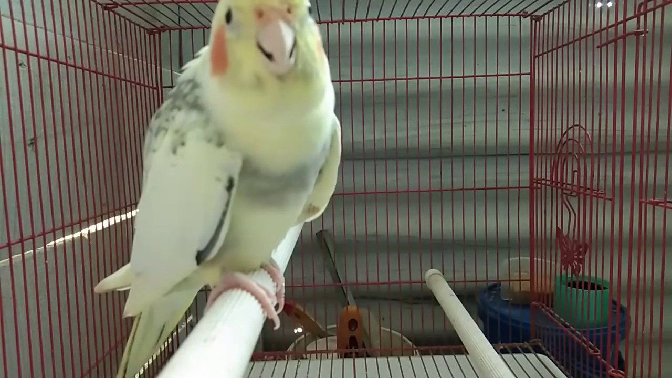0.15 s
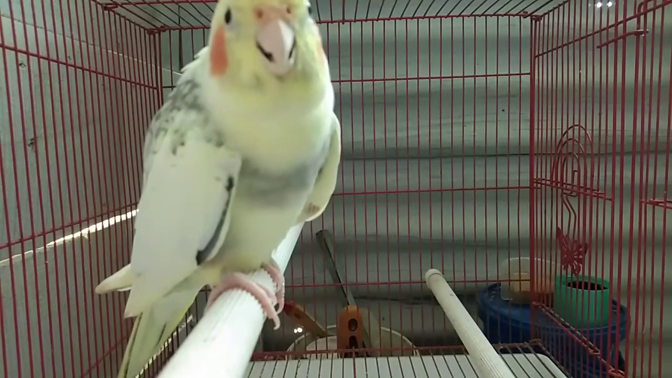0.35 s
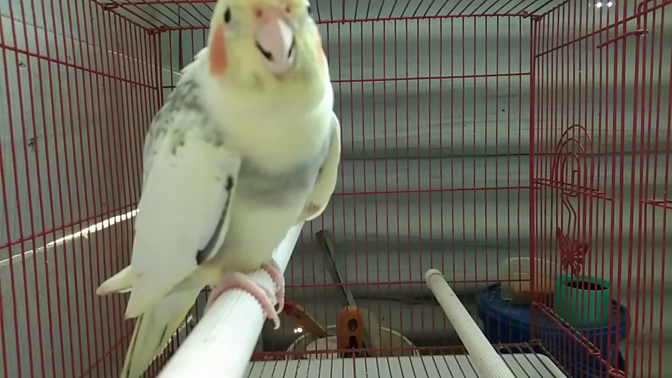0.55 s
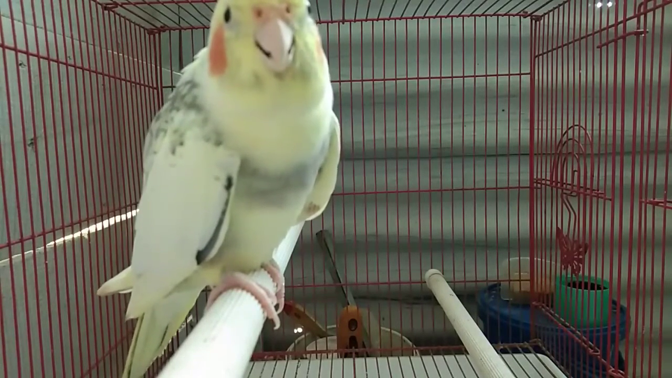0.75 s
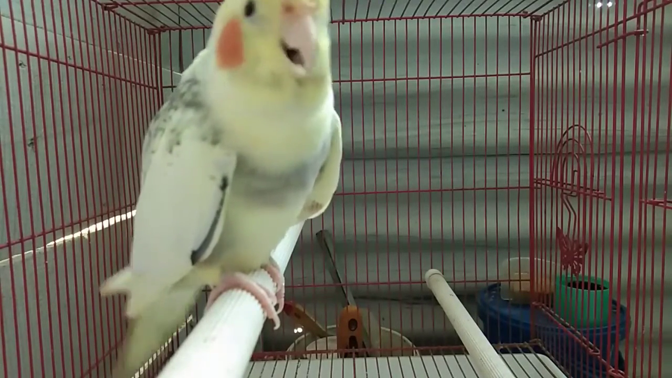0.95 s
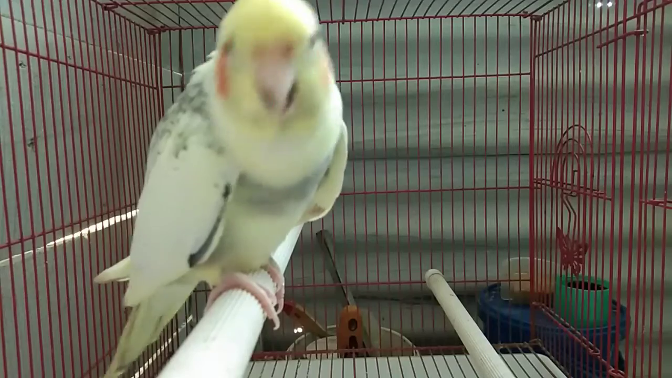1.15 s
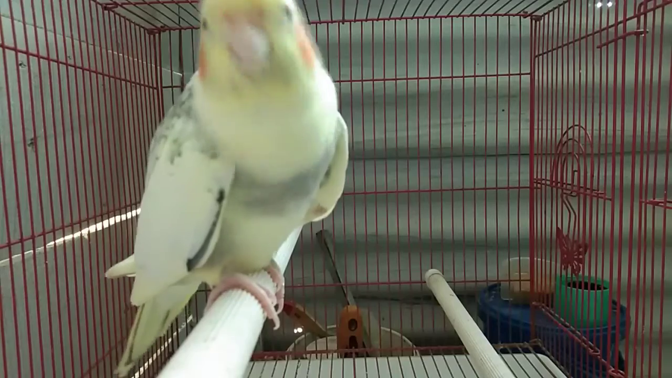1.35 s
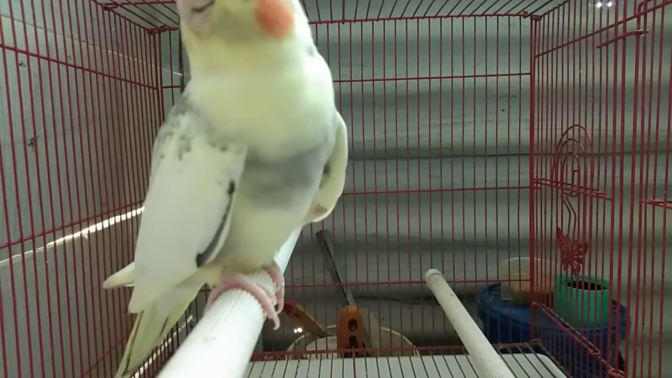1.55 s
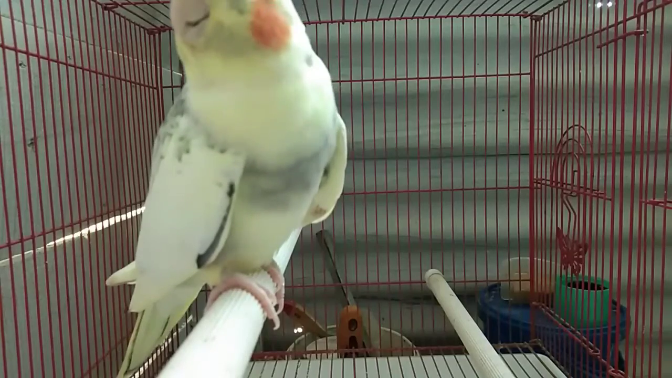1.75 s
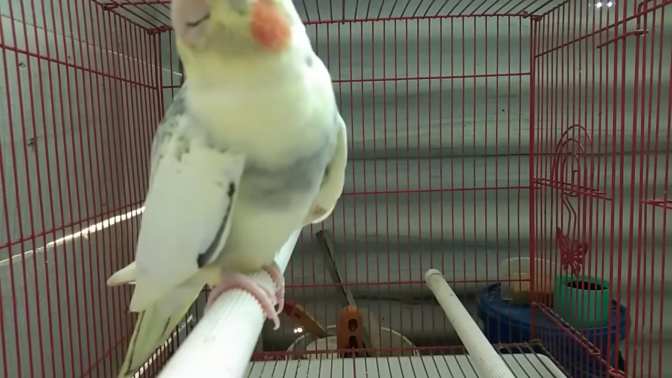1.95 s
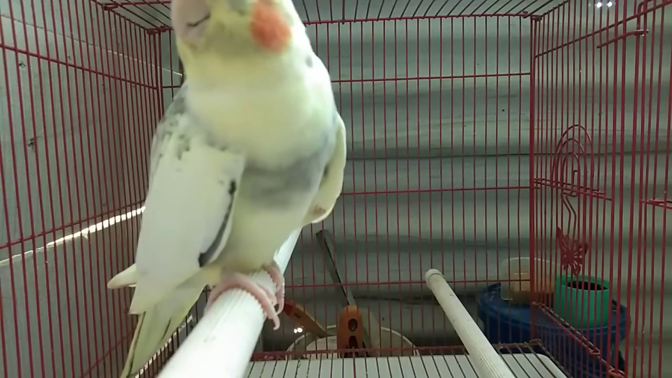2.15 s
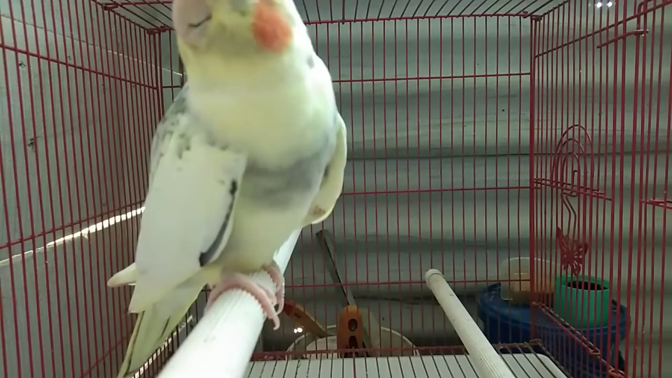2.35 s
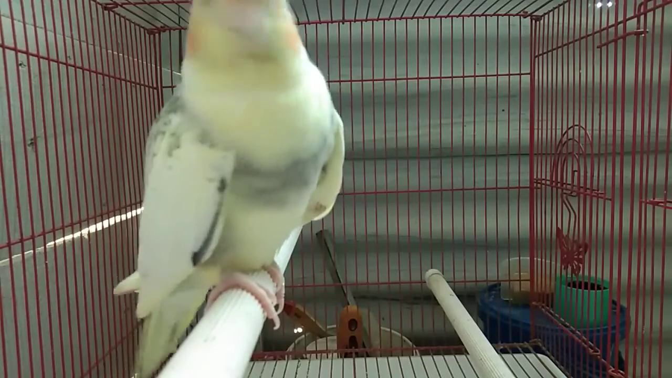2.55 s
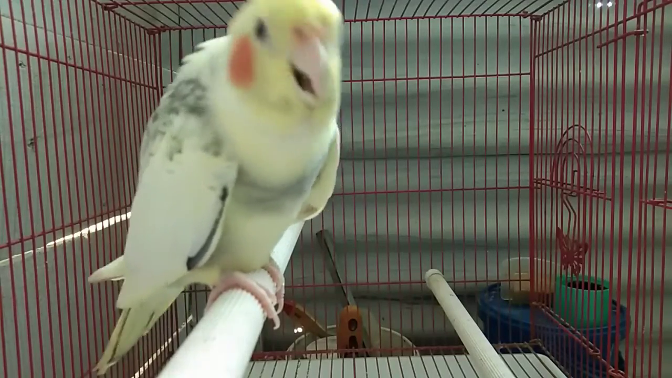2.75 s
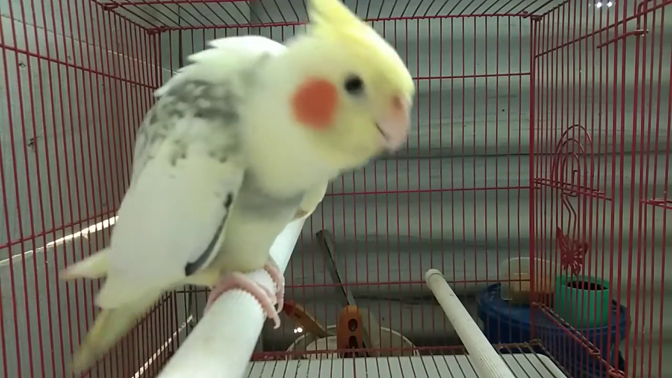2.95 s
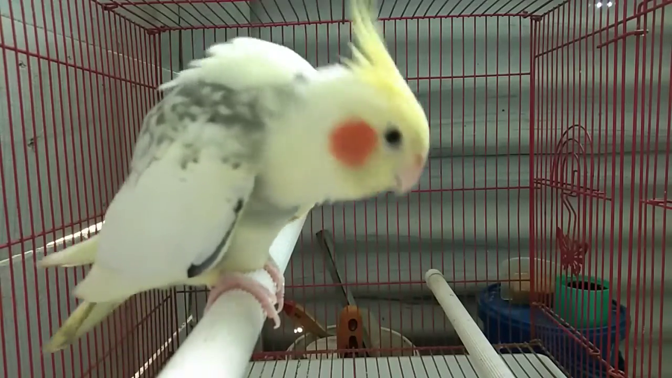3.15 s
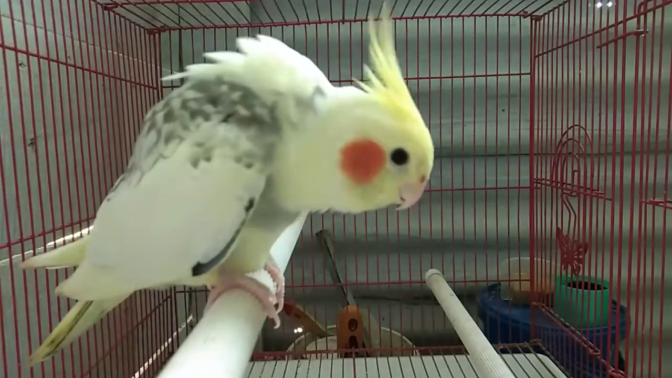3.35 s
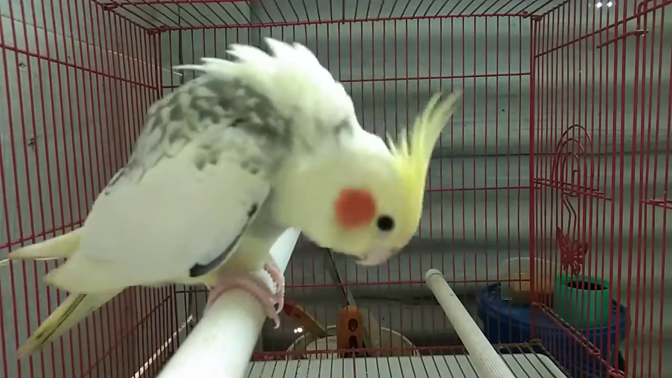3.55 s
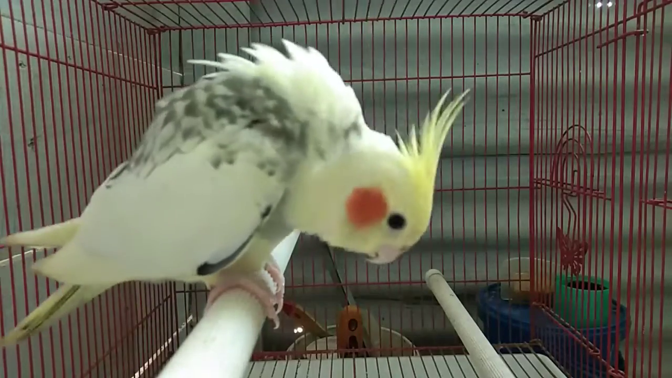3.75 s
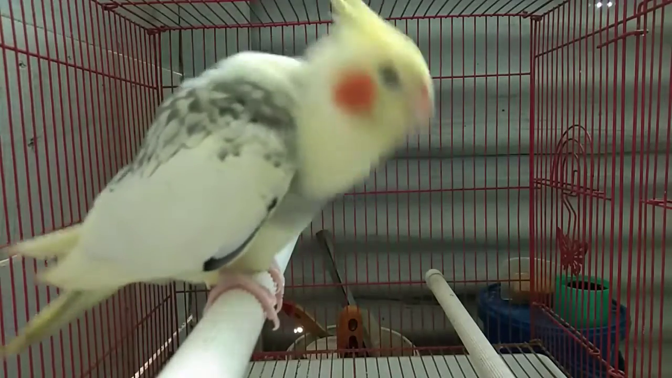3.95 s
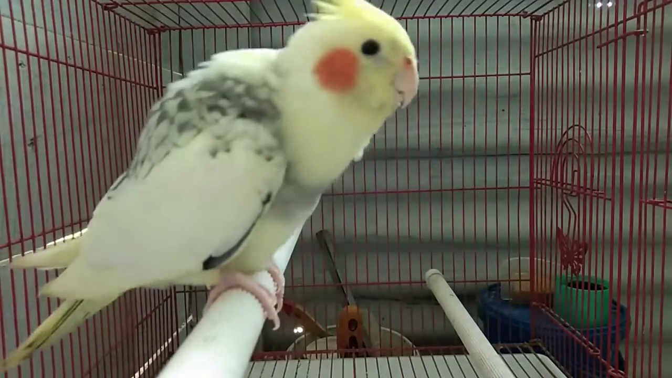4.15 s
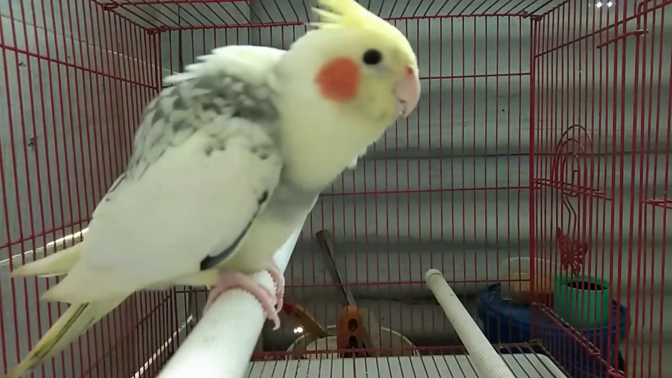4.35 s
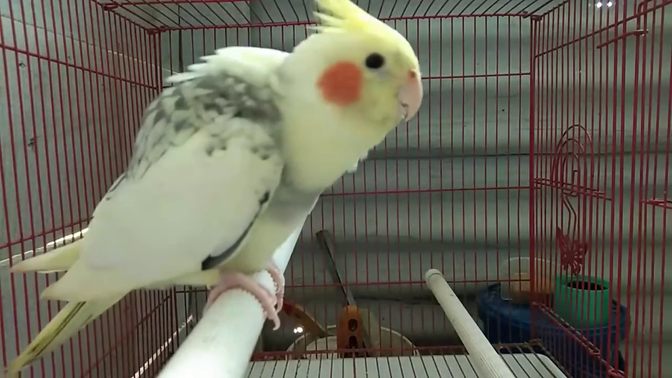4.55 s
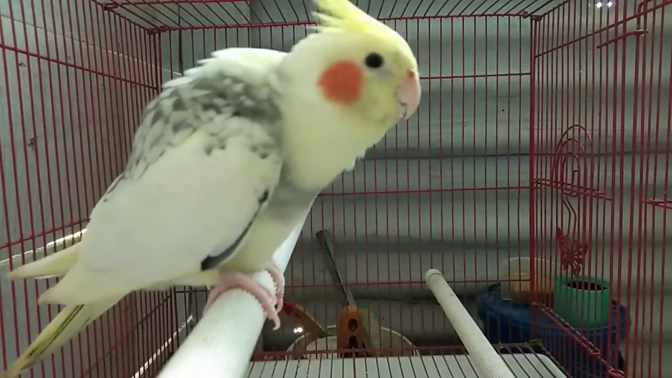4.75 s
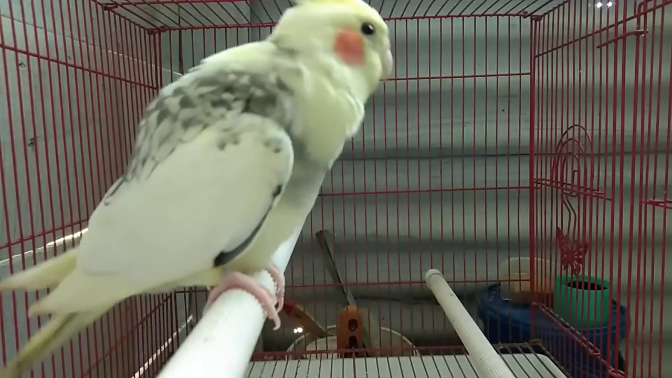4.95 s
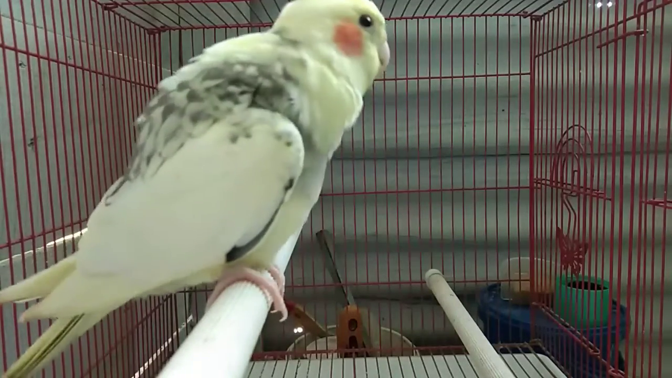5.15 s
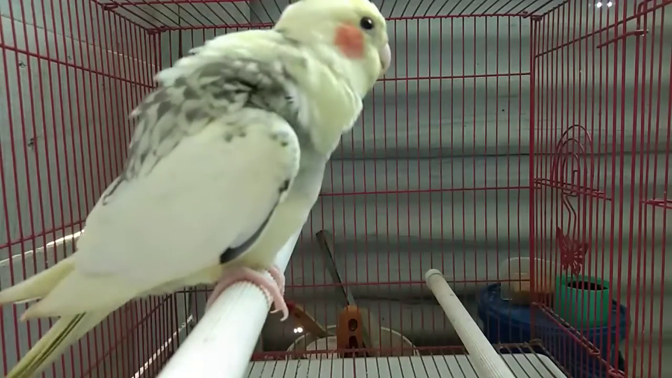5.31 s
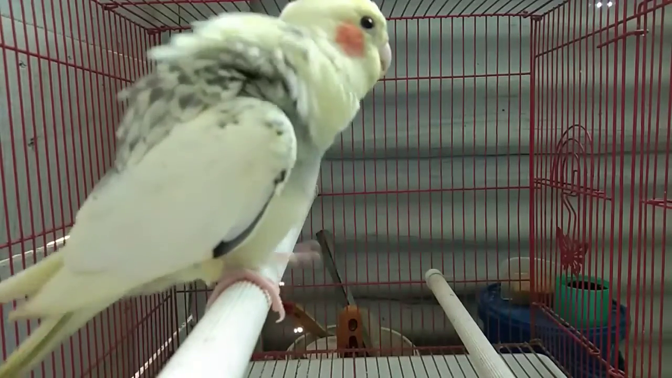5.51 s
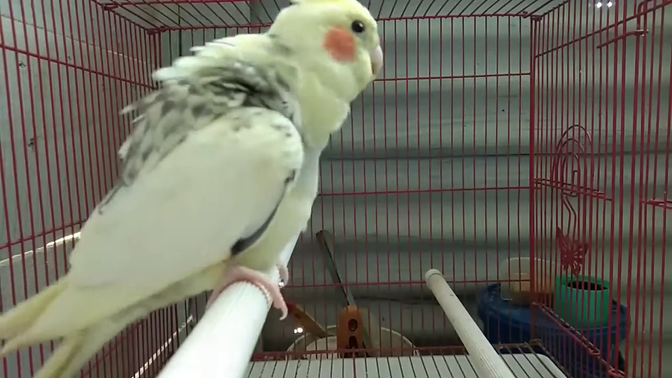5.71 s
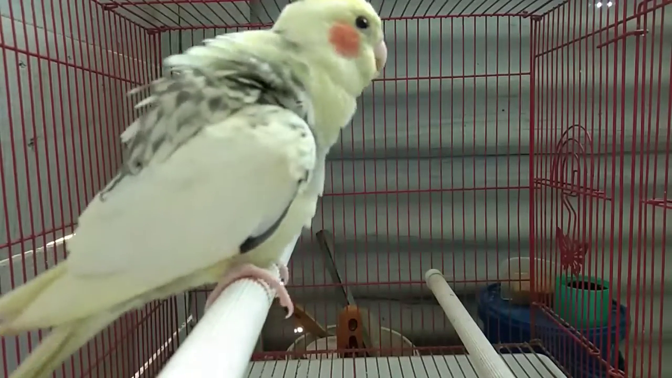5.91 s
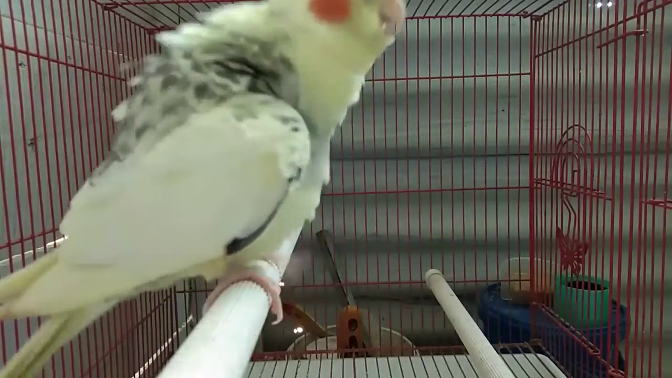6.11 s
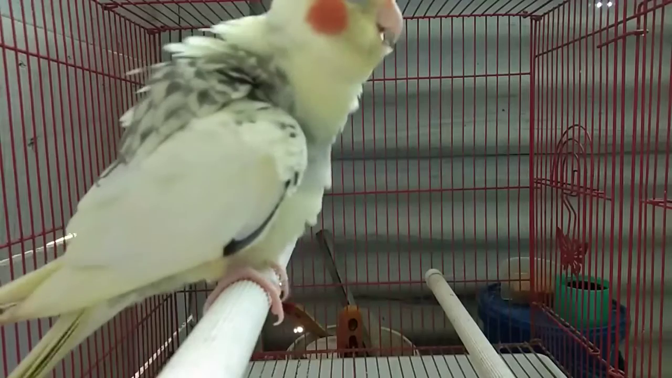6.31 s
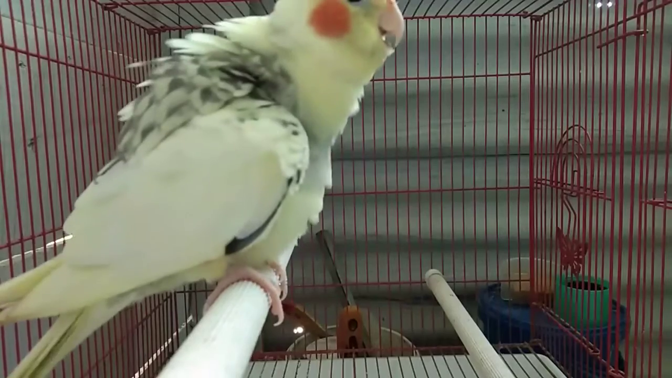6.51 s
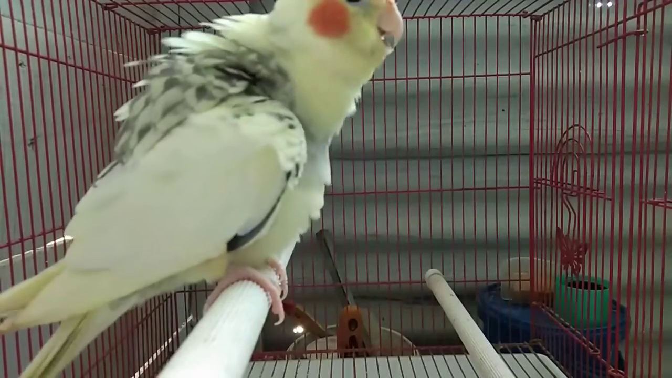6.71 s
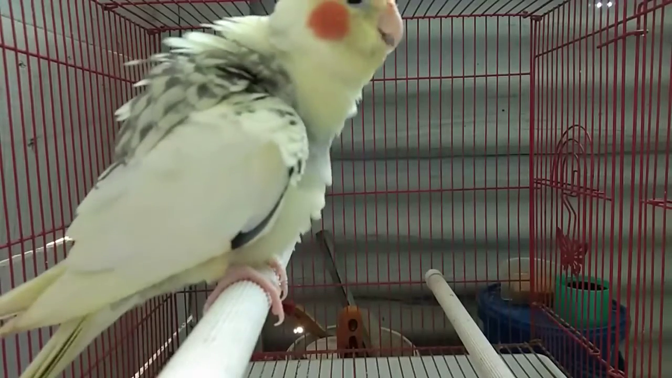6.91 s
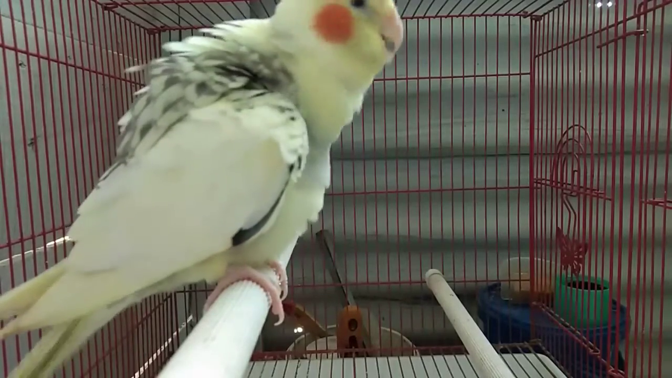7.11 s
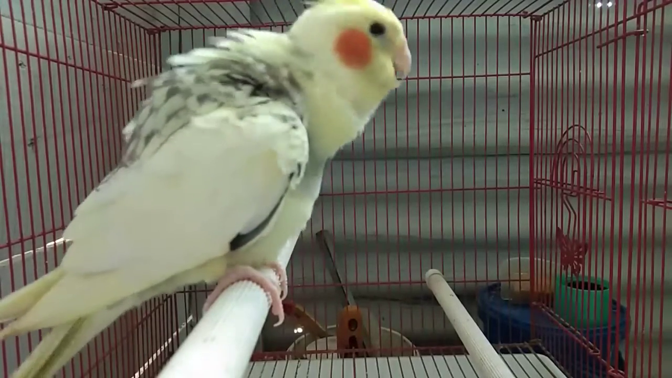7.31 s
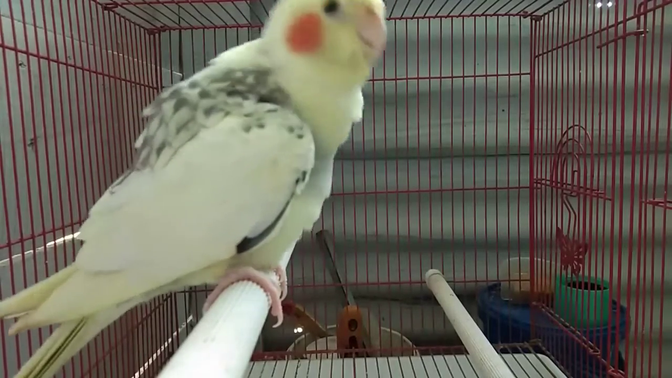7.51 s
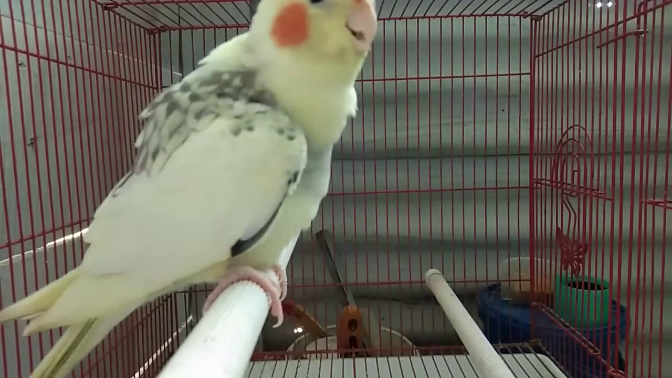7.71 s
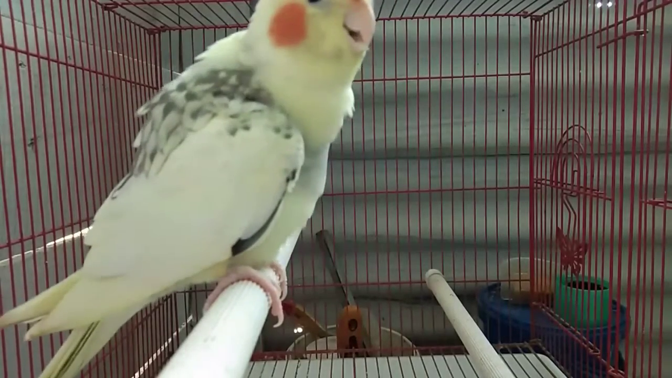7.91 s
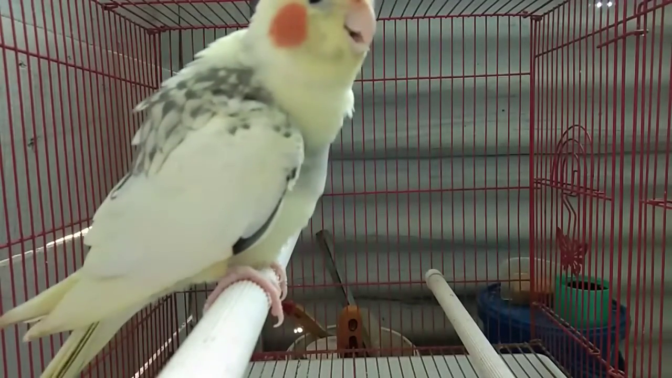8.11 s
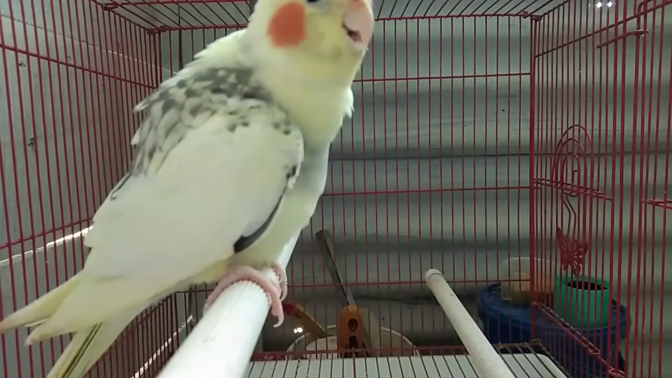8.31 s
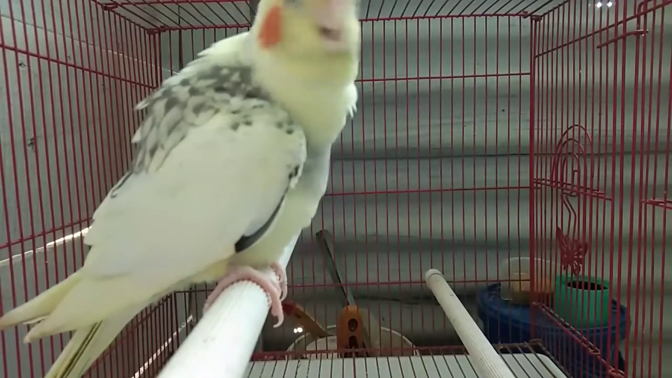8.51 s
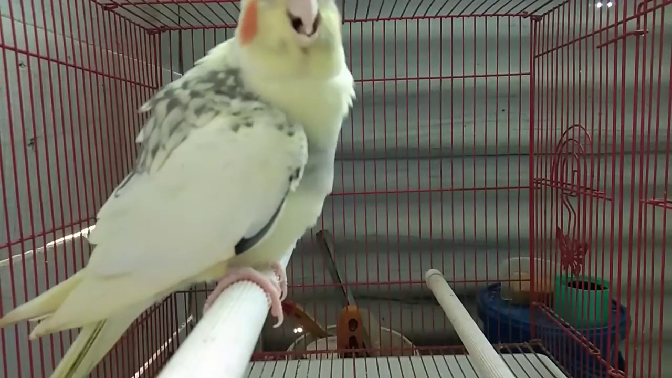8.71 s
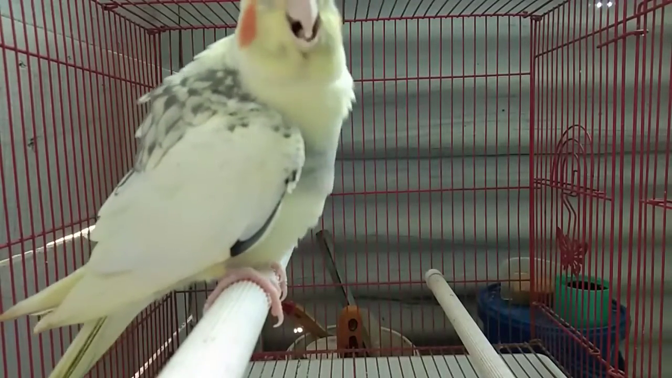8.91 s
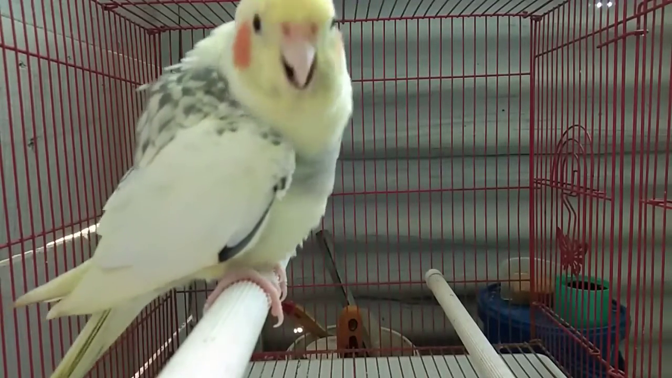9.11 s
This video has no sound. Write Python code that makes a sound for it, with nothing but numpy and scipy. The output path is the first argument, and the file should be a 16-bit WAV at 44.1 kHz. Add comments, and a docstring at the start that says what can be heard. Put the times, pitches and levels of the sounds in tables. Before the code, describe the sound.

A cockatiel calls close to the microphone in a small hard-walled room with a short bright reverberation. Faint low motor hum, rumble and air hiss run throughout, swelling slightly around 5 s. After a few barely audible chirps, a loud piercing call bursts out at 1.0 s, a quarter second of fast warbling swings climbing to a high closing note. Soft chirps and a double tick follow at 1.5-2.6 s. A second loud call comes at 2.7 s, then low quiet chirps and small clicks to 4.6 s. Three strong hoarse squawks rattle at 4.7-5.0 s, followed by a quick cluster of brighter chirps and rasps to 5.6 s. Ticks and chirps return near 6 s, with raspy squawks at 6.5-7.0 s. The third loud call sounds at 7.15 s. After a pause, chirps at 8.3-8.6 s lead into hoarse squawks until 9.1 s.

```python
"""A cockatiel close to the microphone in a small hard-walled room gives three loud warbling calls.
Between them come soft chirps, runs of hoarse chatter and clicks of beak and claws.
Calls and chirps are harmonics shaped by the throat; the chatter is mostly noise ringing in the beak.
Clicks are short noise bursts. Motors outside hum as drifting sines over rumble and faint air hiss."""
import sys
import numpy as np
from scipy import signal
from scipy.fft import rfft, irfft
from scipy.io import wavfile
from scipy.ndimage import uniform_filter1d, minimum_filter1d

SR = 44100
rng = np.random.default_rng(int(sys.argv[2]) if len(sys.argv) > 2 else 0)


def digitize_waveform(pressure):
    """Quantize a signal to 16-bit integers and store it at the path in sys.argv[1].

    Rows of a 2-D input are taken as channels; values are limited to [-1, 1].
    """
    field = np.atleast_2d(pressure).T
    bounded = np.clip(field, -1, 1)
    quanta = np.round(bounded * 32767).astype(np.int16)
    wavfile.write(sys.argv[1], SR, quanta)


N = 404397
TOP_HZ = 15700  # upper limit of the recorder and of the voice harmonics

# colour of the bird's breath hiss: freq_hz, gain_db
HISS = [(700, -49), (1300, -33.5), (1850, -8), (2600, -9), (3400, -9), (4600, -6), (6300, -6),
        (7300, -17.5), (8500, -26), (10000, -39.5), (12000, -47), (15000, -30)]


def undb(db):
    """Decibels to amplitude gain."""
    return 10 ** (np.asarray(db) / 20)


def unit(x):
    """Scale to rms 1."""
    return x / np.sqrt(np.mean(x ** 2) + 1e-18)


def gain_at(hz, spectrum):
    """Gain of a (freq_hz, gain_db) table, interpolated in dB over log frequency."""
    table_hz, table_db = np.transpose(spectrum)
    return undb(np.interp(np.log(hz + 1), np.log(table_hz), table_db))


def noise(spectrum, count):
    """White noise coloured by a spectrum table, rms 1."""
    freq_hz = np.fft.rfftfreq(count, 1 / SR)
    bins = rfft(rng.standard_normal(count)) * gain_at(freq_hz, spectrum)
    return unit(irfft(bins, count))


def wander(t, rate):
    """Random drift: straight lines between normal draws, rate draws per unit of t, rms about 1."""
    values = rng.standard_normal(8192)
    return 1.206 * np.interp((t - t[0]) * rate, np.arange(len(values)), values)


def span(start_s, end_s):
    """Sample times of one sound."""
    count = max(int((end_s - start_s) * SR), 64)
    return start_s + np.arange(count) / SR


def fade(t, attack_s, release_s):
    """Linear fade in and out."""
    fade_in = np.clip((t - t[0]) / attack_s, 0, 1)
    fade_out = np.clip((t[-1] - t) / release_s, 0, 1)
    return fade_in * fade_out


def add(out, start_s, x):
    """Mix a sound in at its time."""
    i = max(int(start_s * SR), 0)
    out[i:i + len(x)] += x[:max(N - i, 0)]


def motor_hums(t, waver_share=0.00794, waver_db=2):
    """Each motor is a sine that swells, fades and glides, with small drifts of pitch and level."""
    # hums: swell_start_s, loudest_s, gone_s, first_hz, last_hz, peak_rms_db
    hum_list = [(-1, .2, 1.7, 58, 48, -46.5), (0.97, 2.4, 7.6, 72, 65, -47.5),
                (0.9, 4.5, 12.2, 120, 120, -48), (3.5, 4.6, 5.2, 140, 150, -45),
                (1.5, 3.8, 5.6, 140, 190, -55.5), (3.5, 5.6, 6.6, 300, 298, -59),
                (7, 14, 13, 140, 170, -49.5)]
    out = np.zeros(N)
    for start_s, peak_s, end_s, first_hz, last_hz, db in hum_list:
        glide_hz = np.interp(t, [start_s, end_s], [first_hz, last_hz])
        hz = glide_hz * (1 + waver_share * wander(t, 8.0))
        swell = np.sqrt(np.interp(t, [start_s, peak_s, end_s], [0, 1, 0]))
        level = swell * undb(db + waver_db * wander(t, 4.3))
        out += np.sqrt(2) * level * np.sin(2 * np.pi * np.cumsum(hz) / SR)
    return out


def outside(air_db=-45.5, bass_db=-1.44, bass_swell_db=4,
            rush_db=-63.5, rush_swell_db=10.5, rush_drift_db=1.9):
    """Air noise with a rumbling bass, plus a rush; bass and rush swell once, slowly, under the hums."""
    # background air: freq_hz, gain_db
    air_spectrum = [(20, -23.5), (38, -13.5), (60, 3.5), (90, -1.5), (135, 4), (200, -3.5), (300, -12.5),
                    (600, -21.5), (1200, -31), (2800, -30.5), (6300, -32.5), (8500, -48), (12000, -60.5),
                    (16000, -58)]
    rush_spectrum = [(100, -23.5), (350, -3.5), (750, -4.0), (1100, -7.0),
                     (2000, -13.5), (5000, -29), (12000, -47.5)]
    swell_at_s, swell_width_s = 5.07, 2.1
    t = np.arange(N) / SR
    surge = np.exp(-((t - swell_at_s) / swell_width_s) ** 2)

    air = noise(air_spectrum, N)
    bass = signal.sosfiltfilt(signal.butter(2, 350, fs=SR, output="sos"), air)
    swelling_bass = bass * undb(bass_db + bass_swell_db * surge)
    out = undb(air_db) * (air - bass + swelling_bass)

    rush = noise(rush_spectrum, N)
    out += rush * undb(rush_db + rush_swell_db * surge + rush_drift_db * wander(t, 3))
    return out + motor_hums(t)


def room(x, extra_db, tail_db=-8, t60_s=0.32, build_s=0.0052):
    """Direct sound, near reflections and a short dense tail; the response has unit energy."""
    # nearby surfaces: delay_s, level_db relative to the direct sound
    echo_list = [(.0023, -16.5), (.0052, -11.5), (.0091, -16)]
    tail_spectrum = [(200, -6), (2000, -1.0), (3000, 3.0), (6000, 0), (9000, 0.0), (15000, 4.5)]
    t = span(0, 0.7)
    tail = noise(tail_spectrum, len(t)) * undb(-60 * t / t60_s)
    tail = tail * np.clip(t / build_s - 0.5, 0, 1)
    response = undb(tail_db + extra_db) * tail / np.sqrt(np.sum(tail ** 2))
    response[0] += 1
    for delay_s, db in echo_list:
        response[int(delay_s * SR)] += undb(db)
    return signal.fftconvolve(x, response / np.sqrt(np.sum(response ** 2)))[:N]


def clicks(t60_s=0.054, attack_s=0.0014):
    """Ticks of horn on horn and on the perch: coloured noise dying away exponentially."""
    # clicks: start_s, level_db
    click_list = [(1.862, -33.5), (1.885, -33.5), (2.274, -44.5), (3.59, -39.5), (4.449, -36.5),
                  (5.164, -36), (5.968, -33), (6.132, -34)]
    # ringing of a click: freq_hz, gain_db
    tick_spectrum = [(300, 0), (1200, -6), (2200, 1.5), (4500, -5.5), (7000, -12), (9500, -39.5),
                     (15000, -40)]
    out, t = np.zeros(N), span(0, 0.082)
    for start_s, db in click_list:
        tick = noise(tick_spectrum, len(t)) * undb(db - 60 * t / t60_s)
        add(out, start_s, tick * fade(t, attack_s, 0.01))
    return out


def syrinx(t, hz, overtone_db, rough, jitter_share=0.087, jitter_rate_hz=900, shimmer_db=6):
    """A membrane's harmonics sweep through the fixed throat; roughness shakes pitch and strength."""
    # throat and beak passband: freq_hz, gain_db
    throat = [(1250, -11), (1750, -20), (2000, -11), (2350, -7.5), (3000, -2.5), (3500, -1), (4200, -6.5),
              (5000, -12), (6100, -13.5), (7200, -25.5), (8800, -46.5), (12000, -65), (14500, -46)]
    hz = hz * (1 + jitter_share * rough * wander(t, jitter_rate_hz))
    phase = 2 * np.pi * np.cumsum(hz) / SR
    k = np.arange(1, 11)[:, None]
    # a pressed voice (positive dB) lifts harmonics 2 and 3; a soft one loses all its overtones
    harmonic_db = np.where(k > 3, min(overtone_db, 0), overtone_db) * (k > 1)
    gains = gain_at(k * hz, throat) * undb(harmonic_db) * (k * hz < TOP_HZ)
    # effort sets the level, the throat only shares it among the harmonics
    gains = gains / np.sqrt(np.sum(gains ** 2, axis=0) / 2 + 1e-18)
    voice = np.sum(gains * np.sin(k * phase), axis=0)
    return voice * undb(shimmer_db * rough * wander(t, 400))


def chirps(hiss_db=-6, attack_share=0.3, tremor_share=0.085, tremor_rate_hz=90):
    """Soft notes, each an unsteady glide bowed upward; short and pressed ones are rougher and hissier."""
    # chirps: start_s, length_s, first_hz, last_hz, level_db, overtone_db
    chirp_list = [ (0.213, 0.047, 2890, 3380, -50, 8.5), (0.748, 0.12, 2560, 2580, -60, 8),
                  (0.923, 0.084, 2044, 2616, -46, -5), (1.481, 0.11, 2265, 2837, -45.5, 6),
                  (1.544, 0.14, 3405, 3360, -34, -14.5), (1.676, 0.065, 2150, 2607, -40, -10),
                  (1.743, 0.06, 2854, 2420, -34, -2), (1.832, 0.054, 2380, 1850, -41.5, -22),
                  (2.052, 0.03, 1823, 1924, -46, -13.5), (2.071, 0.035, 2260, 2570, -46, -10),
                  (2.368, 0.14, 2080, 2560, -51, -11), (2.48, 0.17, 3022, 2893, -51.5, -10),
                  (3.131, 0.039, 1864, 1740, -40.5, -5.5), (3.289, 0.045, 1854, 1740, -46, -19),
                  (3.468, 0.11, 1595, 1300, -48.5, -4.5), (3.597, 0.16, 1354, 1525, -47.5, -3.5),
                  (3.763, 0.086, 2130, 2540, -47.5, -12), (3.854, 0.17, 1382, 1603, -45, -1),
                  (3.975, 0.078, 1795, 1986, -42.5, -26), (4.325, 0.17, 1204, 1770, -53, -9),
                  (4.445, 0.055, 1667, 1767, -44.5, -33), (4.619, 0.097, 1342, 1460, -45, -1),
                  (5.196, 0.061, 2200, 1874, -34, 0.5), (5.274, 0.04, 2543, 2220, -32, -24),
                  (5.323, 0.0486, 2908, 2740, -27, 0.5), (5.354, 0.069, 2138, 2287, -23.5, 10.5),
                  (5.427, 0.045, 3770, 3310, -24.5, -17), (5.507, 0.067, 2376, 2233, -30, 17),
                  (5.795, 0.068, 2364, 1876, -44, 0.5), (5.842, 0.043, 2950, 2775, -41.5, 5),
                  (6.153, 0.089, 2820, 2650, -39, -0.5), (6.213, 0.065, 2260, 1694, -35.5, 23.5),
                  (6.257, 0.053, 2756, 2597, -33, 14), (8.262, 0.04, 1696, 2410, -43, -8.5),
                  (8.28, 0.06, 2410, 2517, -29.5, -1.5), (8.334, 0.048, 2737, 2780, -34, -21),
                  (8.441, 0.032, 1924, 1817, -36.5, -5), (8.475, 0.058, 3270, 2760, -37.5, -9),
                  (8.526, 0.069, 2740, 2540, -28.5, -16), (8.517, 0.11, 3340, 3390, -37, -19)]
    bow_share = 0.2  # of the glide's range
    base_rough, typical_s, rough_doubling_db = 0.31, 0.06, 24.5
    out = np.zeros(N)
    for start_s, length_s, first_hz, last_hz, db, overtone_db in chirp_list:
        t = span(start_s, start_s + length_s)
        u = np.linspace(0, 1, len(t))
        shortness = np.sqrt(typical_s / length_s)
        rough = min(base_rough * shortness * 2 ** (overtone_db / rough_doubling_db), 1)
        bow_hz = bow_share * abs(last_hz - first_hz) * np.sin(np.pi * u)
        glide_hz = first_hz + (last_hz - first_hz) * u + bow_hz
        pitch_hz = glide_hz * (1 + tremor_share * rough * wander(t, tremor_rate_hz))
        voice = syrinx(t, pitch_hz, overtone_db, rough)
        voice = voice + rough * undb(hiss_db) * noise(HISS, len(t))
        add(out, start_s, voice * undb(db) * fade(t, attack_share * length_s, 0.06 * length_s))
    return out


def rasps(start_db=-8, end_db=-10, beak_width_hz=3800, flutter_db=3, flutter_rate_hz=450,
          voiced_db=-5, lurch_share=0.14, level_db=1.5, uneven_db=0.6):
    """Hoarse squawks: membranes flap irregularly and chop the air, which rings in the open beak."""
    # squawks: start_s, length_s, relative_level_db, beak_resonance_hz, low_edge_hz
    rasp_list = [ (1.475, 0.13, -47.5, 5200, 4200), (4.68, 0.07, -22, 5020, 1590),
                 (4.734, 0.079, -14, 5210, 1900), (4.891, 0.089, -11, 5210, 2320),
                 (5.185, 0.067, -32.5, 3980, 1900), (5.354, 0.043, -20, 4230, 2300),
                 (5.508, 0.06, -28, 4670, 2600), (6.237, 0.095, -35.5, 4930, 2300),
                 (6.544, 0.079, -25, 5270, 1500), (6.629, 0.11, -22.5, 4840, 1500),
                 (6.867, 0.1, -28, 4724, 1480), (8.469, 0.17, -50.5, 5600, 4500),
                 (8.689, 0.061, -20.5, 4530, 1580), (8.835, 0.098, -27, 4460, 1670),
                 (8.961, 0.15, -24.5, 4304, 2390)]
    peak_share = 0.89  # how far through a squawk the effort peaks
    out = np.zeros(N)
    for start_s, length_s, db, beak_hz, low_hz in rasp_list:
        peak_s, end_s = start_s + peak_share * length_s, start_s + length_s
        t = span(start_s, end_s)
        beak = signal.iirpeak(beak_hz, beak_hz / beak_width_hz, fs=SR)
        air = unit(signal.lfilter(*beak, noise(HISS, len(t))))

        # a broken tone lurches inside the hiss, its second harmonic near the beak resonance
        tone_hz = beak_hz / 2 * (1 + lurch_share * wander(t, 130))
        tone = syrinx(t, tone_hz, overtone_db=29, rough=0.453)
        squawk = (air + undb(voiced_db) * tone) * undb(flutter_db * wander(t, flutter_rate_hz))

        # tongue and head sit differently each time: new spectral ridges and low edge
        freq_hz = np.fft.rfftfreq(len(t), 1 / SR)
        ridges = undb(uneven_db * wander(freq_hz / TOP_HZ, 52.6))
        edge = 1 / np.sqrt(1 + (low_hz / (freq_hz + 1)) ** 10)
        squawk = unit(irfft(rfft(squawk) * ridges * edge, len(t)))

        # effort arches over its peak
        before = np.interp(t, [start_s, peak_s], [1, 0])
        after = np.interp(t, [peak_s, end_s], [0, 1])
        effort_db = start_db * before ** 1.8 + end_db * after ** 3.1
        add(out, start_s, squawk * undb(db + level_db + effort_db) * fade(t, 0.017, 0.03))
    return out


def calls(rough=0.042, hiss_db=-40, tremor_share=0.013, tremor_rate_hz=260,
          crest_db=-3, flutter_db=2.3, flutter_rate_hz=130):
    """Loud contact calls: from a shared opening pitch the voice climbs in swings to a high closing note."""
    # calls: start_s, length_s, opening_note_s, one_swing_s, climb_target_hz, closing_note_hz
    call_list = [(1.022, 0.254, 0.026, 0.0875, 1860, 2880), (2.706, 0.25, 0.0215, 0.085, 1850, 3060),
                 (7.162, 0.251, 0.0215, 0.0865, 1935, 3020)]
    opening_hz, climb_s, swing_share = 1260, 0.09, 0.41  # each swing lifts pitch by this share
    call_db, opening_db, swell_s = -8.5, -19, 0.042
    closing_rise_s, closing_hold_s, closing_db = 0.018, 0.014, 2.5
    out = np.zeros(N)
    for start_s, length_s, opening_s, swing_s, top_hz, closing_hz in call_list:
        t = span(0, length_s)
        climb_hz = top_hz + (opening_hz - top_hz) * np.exp(-t / climb_s)
        swing = np.sin(np.pi * np.maximum(t - opening_s, 0) / swing_s) ** 2
        closing = np.clip(1 + (t - length_s + closing_hold_s) / closing_rise_s, 0, 1) ** 2
        warble_hz = (1 - closing) * climb_hz * (1 + swing_share) ** swing + closing * closing_hz
        # the muscles tremble a little
        pitch_hz = warble_hz * (1 + tremor_share * wander(t, tremor_rate_hz))
        voice = syrinx(t, pitch_hz, 0, rough) + undb(hiss_db) * noise(HISS, len(t))

        effort_db = call_db + opening_db * np.exp(-t / swell_s)
        effort_db = effort_db + crest_db * swing + closing_db * closing
        level = undb(effort_db + flutter_db * wander(t, flutter_rate_hz))
        add(out, start_s, voice * level * fade(t, 0.00096, 0.0054))
    return out


def scene():
    """The open beak beams the calls at the microphone; other bird sounds come more by way of the walls."""
    background = outside()
    soft_sounds = room(chirps() + clicks(), extra_db=9.0)
    chatter = room(rasps(), extra_db=7.5)
    loud_calls = room(calls(), extra_db=-0.5)
    return (background + soft_sounds + chatter + loud_calls)[None]


def record(dry, ceiling=0.77):
    """A limiter snaps down on the loudest peaks, and the recorder cuts the top."""
    gain = np.minimum(1, ceiling / (np.abs(dry) + 1e-9))
    gain = minimum_filter1d(gain, size=300)
    gain = uniform_filter1d(uniform_filter1d(gain, size=14), size=10)
    lowpass = signal.ellip(8, 0.2, 70, TOP_HZ, fs=SR, output="sos")
    return signal.sosfilt(lowpass, dry * gain)


dry = scene()
out = record(dry)
digitize_waveform(out)
```